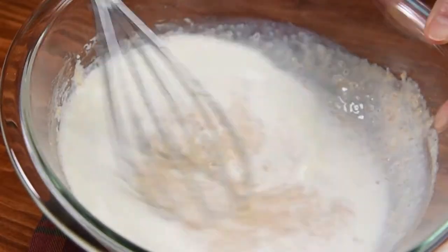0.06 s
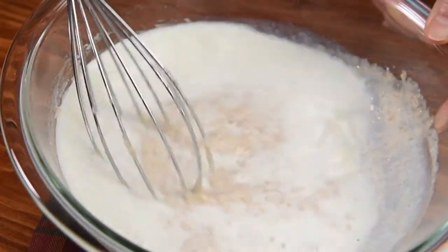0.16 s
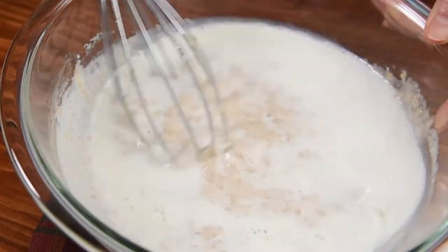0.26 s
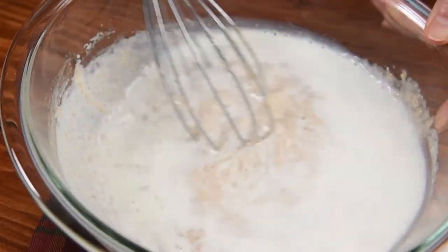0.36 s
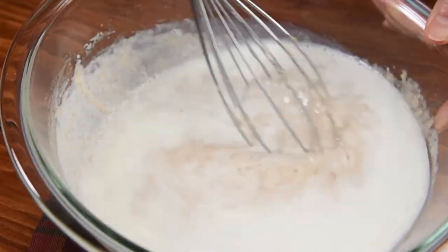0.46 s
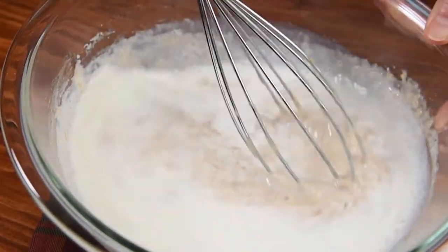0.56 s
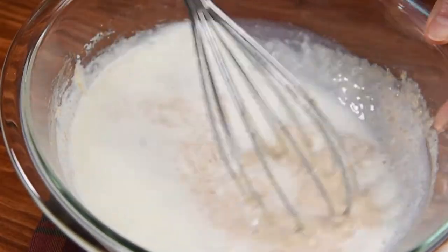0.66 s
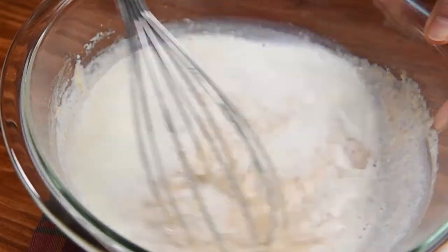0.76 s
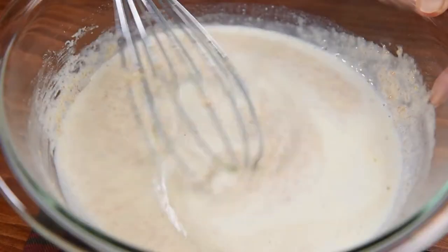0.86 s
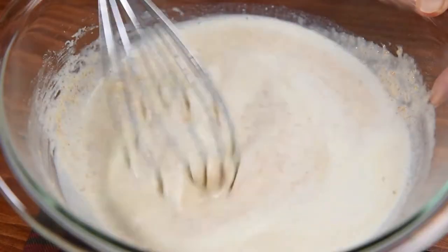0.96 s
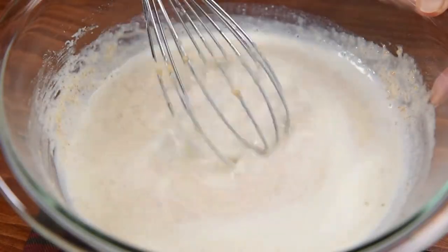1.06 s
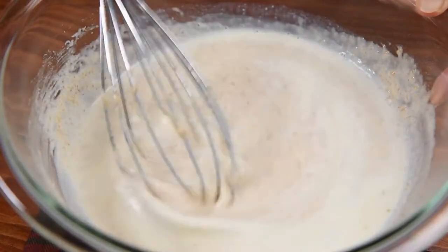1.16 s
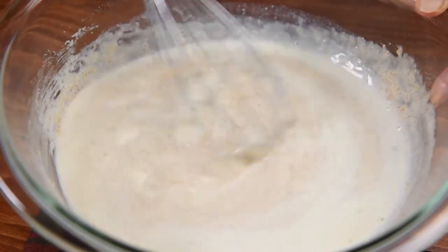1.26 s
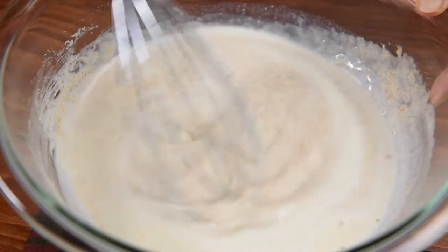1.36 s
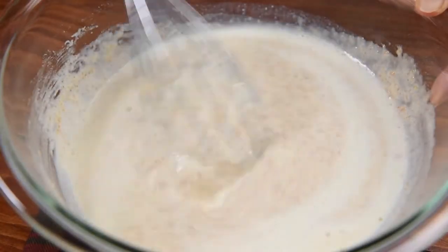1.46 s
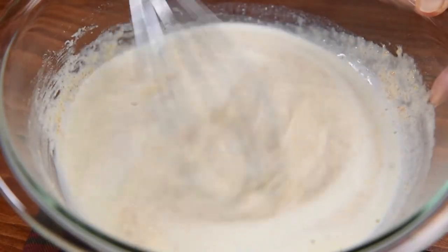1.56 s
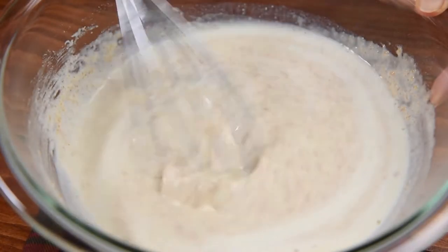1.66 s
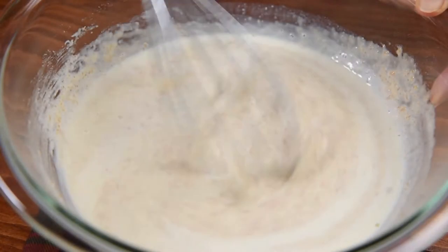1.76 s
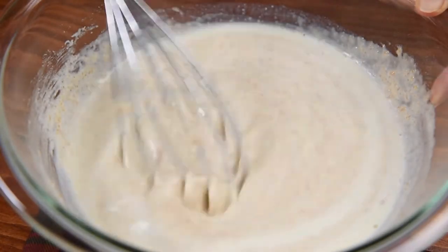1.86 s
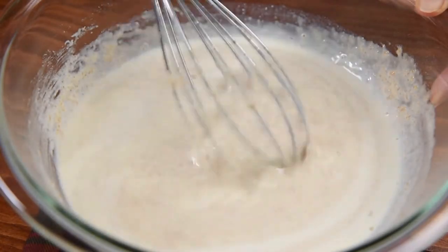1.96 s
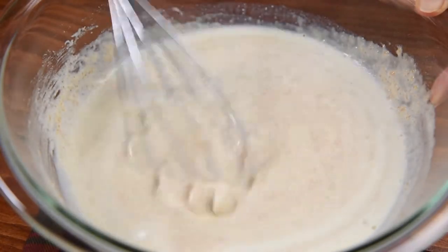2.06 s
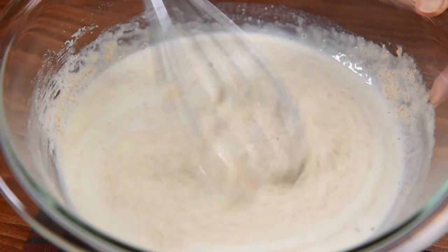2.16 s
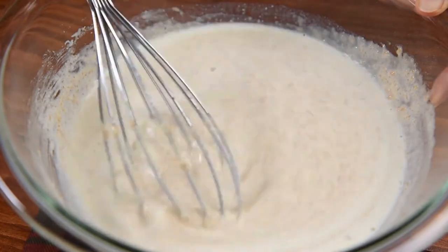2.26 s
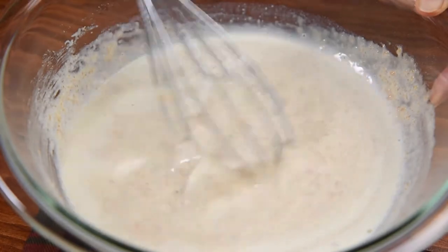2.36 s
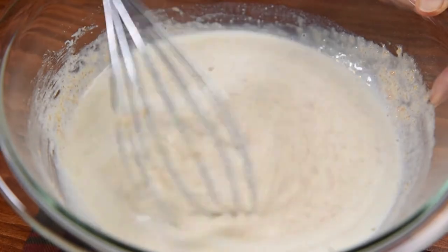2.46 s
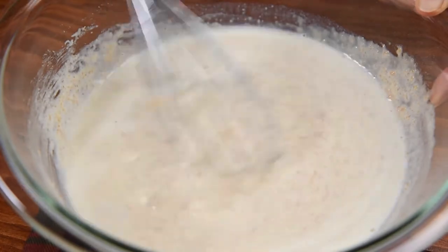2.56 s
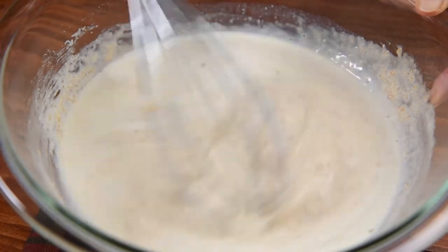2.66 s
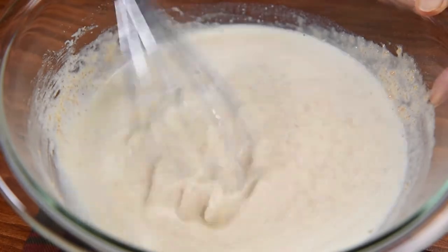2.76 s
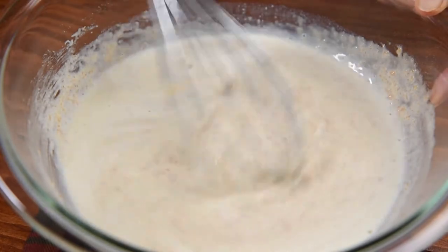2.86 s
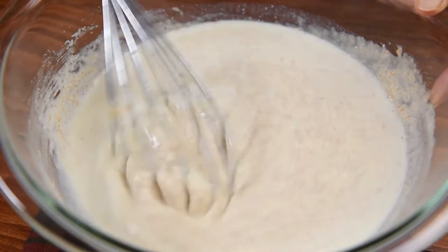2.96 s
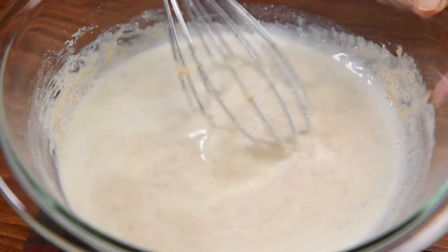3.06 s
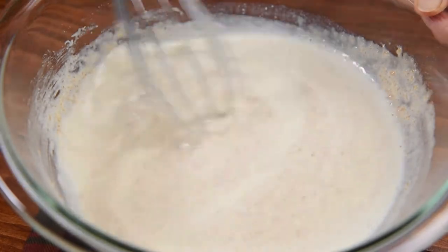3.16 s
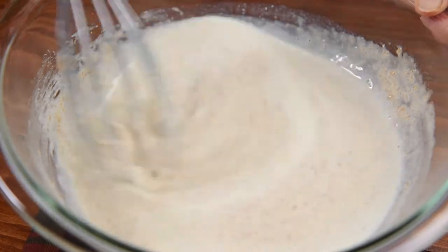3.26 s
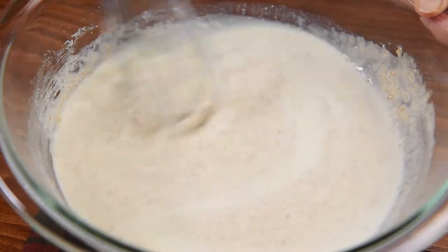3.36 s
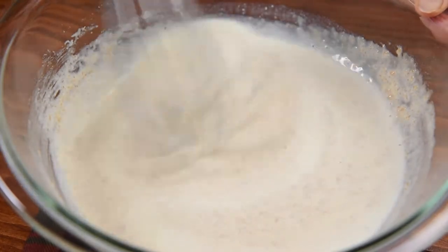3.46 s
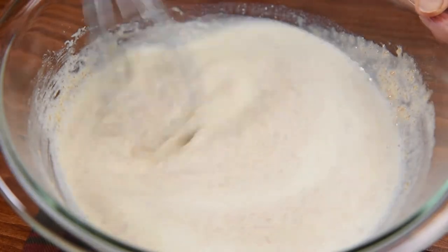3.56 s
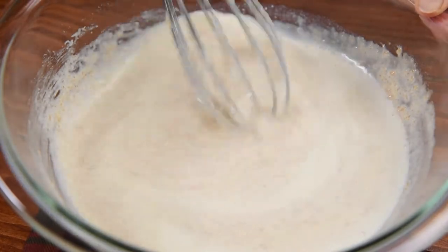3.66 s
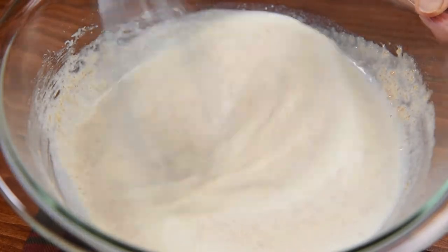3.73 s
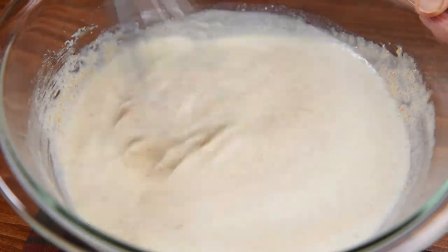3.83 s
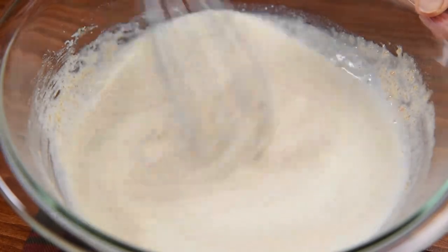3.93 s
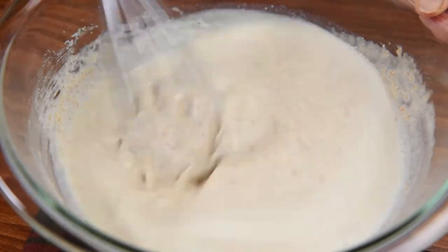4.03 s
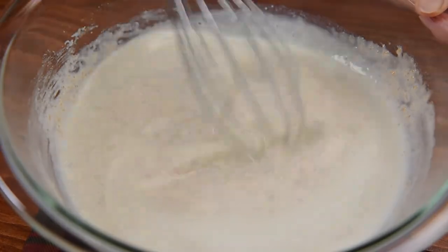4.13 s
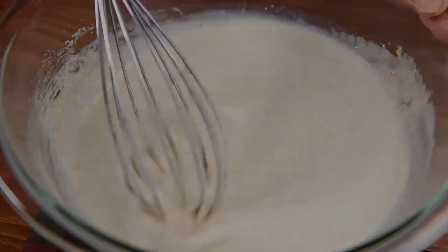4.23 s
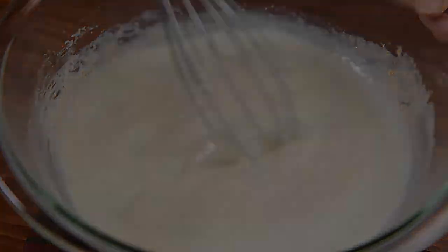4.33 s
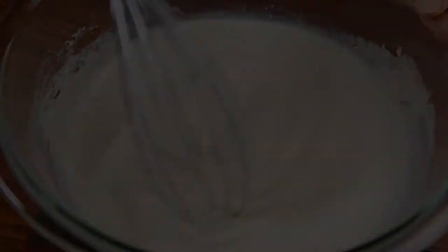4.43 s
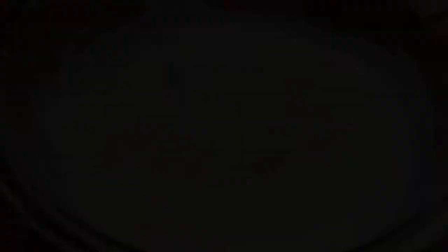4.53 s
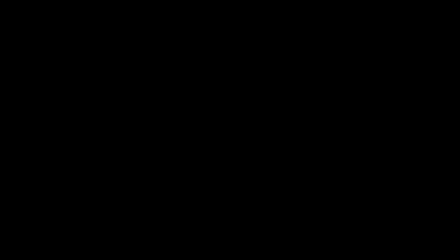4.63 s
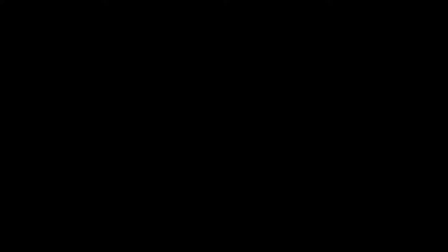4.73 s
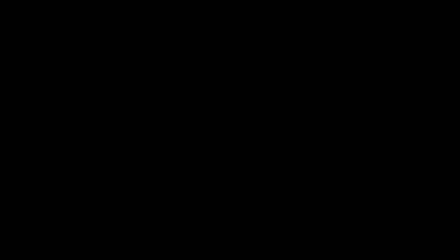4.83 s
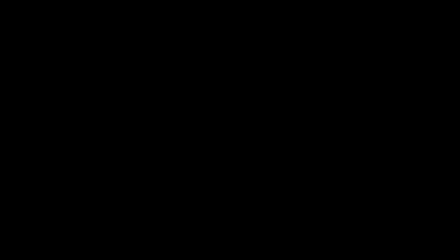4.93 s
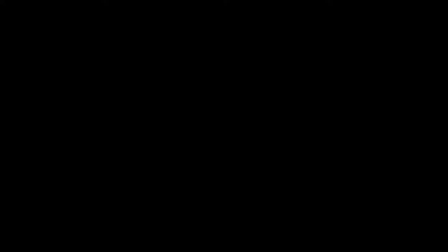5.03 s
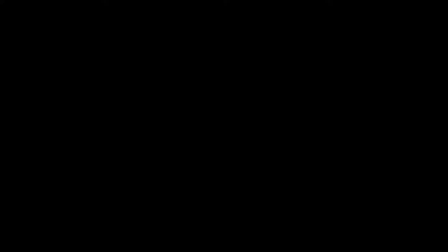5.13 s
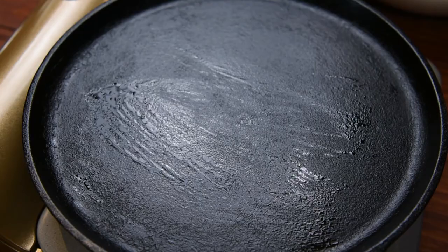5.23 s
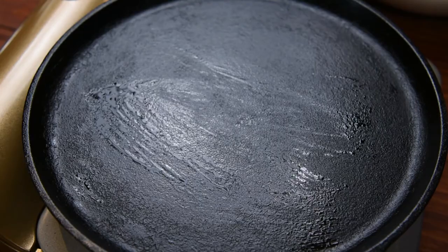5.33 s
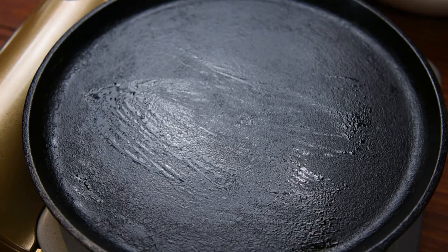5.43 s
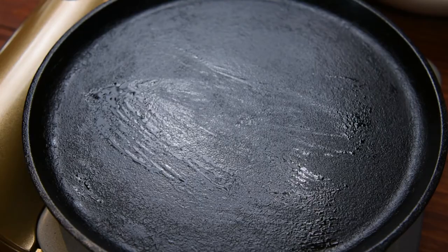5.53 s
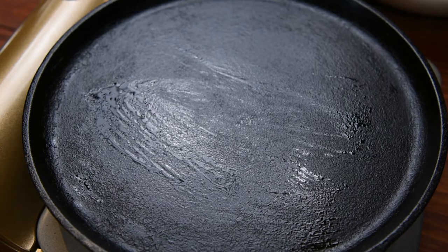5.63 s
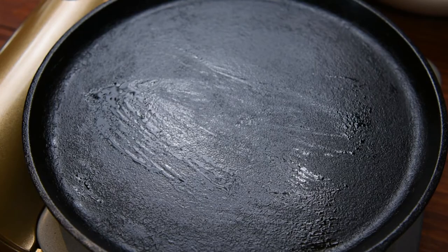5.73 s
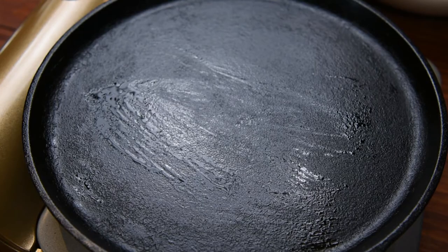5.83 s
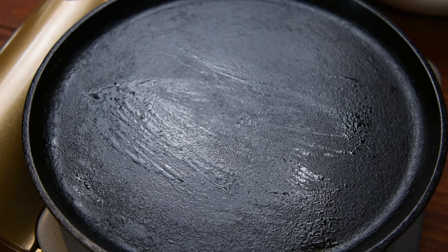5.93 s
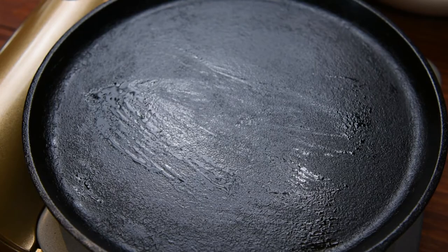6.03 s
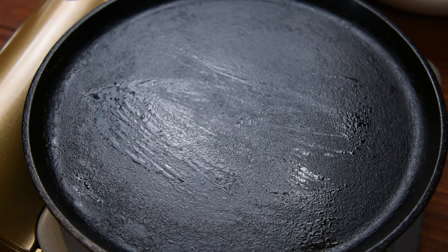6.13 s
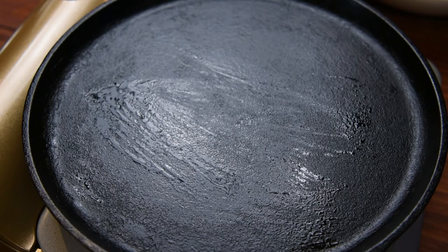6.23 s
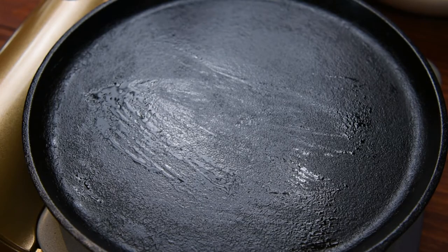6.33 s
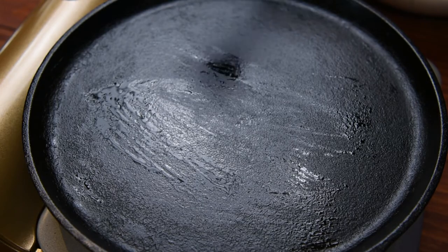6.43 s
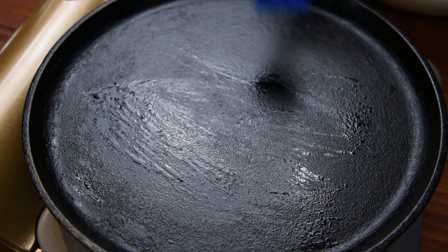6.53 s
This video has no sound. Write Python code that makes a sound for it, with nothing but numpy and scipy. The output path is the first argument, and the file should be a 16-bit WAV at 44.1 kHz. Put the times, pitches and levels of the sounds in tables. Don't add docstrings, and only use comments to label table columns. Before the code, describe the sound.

In a quiet kitchen, a whisk drags softly through lumpy batter with dull knocks and one small glass clink. About a second in, brisk beating starts, four or so clattering strokes a second, each a glassy clack with a hollow bowl note and wet slap. The strokes weaken and stop, a short complete silence follows, then faint oil sizzle and a low fan hum with two soft brush swells. Close microphone, centred.

```python
import sys
import numpy as np
from scipy import signal
from scipy.io import wavfile
from scipy.ndimage import uniform_filter1d

SR = 44100
rng = np.random.default_rng(int(sys.argv[2]) if len(sys.argv) > 2 else 0)


def boost(x):
    u = np.asarray(x, float) / 20
    return 10 ** u


def waveform_to_disk(signal):
    frames = np.transpose(np.atleast_2d(signal))
    scaled = np.clip(frames, -1, 1) * 32767
    samples = np.round(scaled).astype(np.int16)
    wavfile.write(sys.argv[1], SR, samples)


N = 290619
CUT_S, GAP_S = 0.8, (5.1005, 5.2665)
SOFT_S = 0.00019
EDGE_HZ = 15800


def seconds(size):
    return np.arange(size) / SR


def onset(t, rise_s):
    return 1 - np.exp(-t / rise_s)


def between(x, lo_hz, hi_hz):
    return signal.sosfilt(signal.butter(2, [lo_hz, hi_hz], "bandpass", fs=SR, output="sos"), x)


def read(points, hz):
    f, value = np.transpose(points)
    return np.interp(np.log(hz + 1), np.log(f + 1), value)


def evened(x):
    return x / np.sqrt(np.mean(x ** 2) + 1e-20)


def add(mix, s, sound):
    part = mix[round(s * SR):][:len(sound)]
    part += sound[:len(part)]


def ring(modes, scatter_db=0, loose=0, size=5000):
    hz, db, t60 = np.transpose(modes)[:, :, None]
    luck = rng.standard_normal((3, len(modes), 1))
    t = seconds(size)
    gains = boost(db + scatter_db * luck[0])
    turns = hz * (1 + loose * luck[1]) * t + 20 * loose * luck[2]
    sound = gains * boost(-60 * t / np.maximum(t60, 0.002)) * np.sin(2 * np.pi * turns)
    return sound.sum(0) / np.sqrt((gains ** 2).sum()) * onset(t, SOFT_S)


def splash(lo_hz, hi_hz, t60, size=5000):
    puff = between(rng.standard_normal(size), lo_hz, hi_hz)
    t = seconds(size)
    return evened(puff) * boost(-9 - 60 * t / t60) * onset(t, SOFT_S)


def noise(spectrum, patchy_db=0, size=2048):
    hz = np.fft.rfftfreq(size, 1 / SR)
    a, b = rng.standard_normal((N // (size // 4) + 5, len(hz), 2), dtype=np.float32).T
    patches = uniform_filter1d(a * b, size=12, axis=0)
    patches = evened(uniform_filter1d(patches, size=6, axis=1))
    gains = boost(read(spectrum, hz)[:, None] + patchy_db * patches)
    z = (a + 1j * b) * gains * (hz < EDGE_HZ)[:, None]
    return evened(signal.istft(z, nperseg=size, noverlap=size - size // 4)[1][:N])


def whistle(hz, width):
    r = np.exp(-np.pi * width / SR)
    slow = signal.lfilter([1 - r], [1, -r], rng.standard_normal(N) + 1j * rng.standard_normal(N))
    return evened((slow * np.exp(2j * np.pi * hz * seconds(N))).real)


def room_air(t, take):
    # (frequency [Hz], density [dB per Hz])
    colours = [
        [(12, -67), (20, -46), (109, -14), (282, -5.5), (324, -17), (394, -2.5), (453, -11), (633, -12),
         (885, -8), (1340, -12), (1980, -13.5), (2160, -19), (15600, -24.5)],
        [(12, -40), (20, -21.5), (45, -18.5), (85, -7), (176, 1.5), (466, -5), (599, 3), (989, -7), (1140, -4),
         (1240, -11.5), (2220, -18), (2480, -14), (3660, -19), (4450, -17.5), (15600, -23.5)],
        [(12, -51.5), (20, -57), (133, 6.5), (226, -7), (274, 4.5), (353, -25), (536, -4), (1020, -8),
         (2700, -14.5), (15600, -26.5)],
    ]
    # (frequency [Hz], width [Hz], level [dB])
    resonances = [
        [(880, 73, -70.5), (1108, 28, -83)],
        [(589, 58, -71.5), (162.8, 170, -78.5)],
        [(517.4, 170, -69), (2680, 32, -81.5), (1160, 86, -80), (164, 16.4, -76.5)],
    ]
    steps = np.arange(0, t[-1] + 1, 0.15)
    drift_db = 1.6 * np.interp(t, steps, rng.standard_normal(200)[:len(steps)])
    air_db = np.choose(take, (-67, -66.5, -68.5)) + drift_db
    air = np.choose(take, [noise(colour, 1.5) for colour in colours])
    peaks = [sum(boost(db) * whistle(hz, width) for hz, width, db in rows) for rows in resonances]
    return boost(air_db) * air + np.choose(take, peaks)


def scrape(t, take):
    # (time [s], level [dB])
    drag = [(0.0, -65), (0.13, -61.5), (0.27, -57), (0.41, -56), (0.59, -75), (1.17, -72), (1.3, -63.5),
            (1.62, -73), (2.07, -75), (2.46, -68.5), (2.72, -72.5), (3.06, -69), (3.3, -72.5), (3.63, -77),
            (3.97, -64), (4.13, -73), (4.3, -70), (4.9, -82)]
    # (time [s], lift [dB])
    brush = [(5.9, 7.9), (6.39, 10.2)]
    # (frequency [Hz], density [dB per Hz])
    dry_colour = [(180, -58), (300, -35), (372, -23), (572, -11), (611, -15), (1050, -11.5), (1330, -18),
                  (15600, -30.5)]
    # (frequency [Hz], density [dB per Hz])
    wet_colour = [(300, -28.5), (1000, -3), (2500, -0.5), (5000, -3), (9000, -14), (16000, -10.5)]
    oil_db = -74.5 + sum(db * np.exp(-0.5 * ((t - s) / 0.15) ** 2) for s, db in brush)
    level_db = np.where(take == 2, oil_db, np.interp(t, *np.transpose(drag)))
    wet = noise(wet_colour, 1.2, size=256)
    lumps = noise(dry_colour, 2.5, size=256)
    return boost(level_db - 5) * np.where(take, wet, lumps)


def rumble(t, take):
    # (time [s], level [dB])
    grips = [(1.35, -78), (1.75, -67), (2.25, -73), (2.52, -83), (3.06, -88), (4.72, -75), (5.6, -97)]
    rise_s, fall_s = 0.048, 0.084
    gain = boost(np.choose(take, (-108, -101, -101)))
    for s, db in grips:
        gain = gain + boost(db) * np.exp(np.minimum((t - s) / rise_s, (s - t) / fall_s))
    return gain * noise([(8, -6.0), (23, -7.0), (30, -27.5), (50, -72.5)], size=4096)


def knock(db, hz, t60, wood_db):
    body = ring([(hz, 0, t60), (0.91 * hz, -5, t60), (0.568 * hz, -12, t60), (0.385 * hz, -20, t60)], 3)
    body *= onset(seconds(5000), 0.00034)
    return boost(db) * (body + boost(wood_db) * splash(0.34 * hz, 2.5 * hz, 0.1))


def tick(db, hz, t60):
    snap = splash(0.3 * hz, min(2.3 * hz, 16000), 0.3 * t60, size=2000)
    rasp = splash(0.67 * hz, min(1.36 * hz, 16000), 1.1 * t60, size=2000)
    modes = [(hz, 0, 0.57 * t60), (4 * hz, -5, 0.24 * t60), (hz, -7, 0.58 * t60)]
    tone = ring(modes, 1.96, 0.042, size=2000)
    return boost(db) * (1.14 * tone + 1.34 * rasp + 1.7 * snap)


def wire_ticks():
    # (time [s], peak [dB], pitch [Hz])
    ticks = [(0.2725, -36, 7700), (1.146, -46, 3450), (1.273, -53, 10500), (1.327, -43, 2700),
             (1.3521, -28, 4860), (1.386, -39, 2680), (1.567, -48.5, 3870), (2.0534, -32, 10200),
             (2.6766, -38, 5560), (2.713, -39, 5000), (2.929, -53, 4180), (3.385, -41, 3040),
             (3.485, -53, 5460), (3.5984, -48, 3780), (4.385, -47, 2400), (3.6346, -43.5, 2380),
             (3.717, -21.5, 8350), (3.7166, -32.5, 1520), (3.7349, -26.5, 5900), (3.848, -30.5, 3180),
             (3.8521, -40.5, 5500), (3.8907, -34.5, 4500), (3.98, -36, 6070), (3.9857, -39, 5300),
             (3.9906, -37, 4900), (4.0076, -50, 3360), (4.0682, -47, 4000), (4.0842, -38, 3950),
             (4.116, -39.5, 2180), (4.3928, -38.5, 5160)]
    # (time [s], pitch [Hz])
    grazes = [(0.28, 1200), (0.42, 2350), (0.29, 1750), (0.69, 1900), (4.988, 5700), (2.439, 10200),
              (2.5, 2700), (3.144, 5900), (3.488, 5900), (2.9, 11800), (4.4015, 4500), (4.702, 10500),
              (4.0245, 7500), (4.207, 4700), (2.6765, 2900), (3.974, 13000), (1.6, 10500), (0.88, 1400),
              (1.6, 5000), (0.171, 1900), (0.38, 950), (4.3, 3500), (4.9, 14700), (5.0502, 3200)]
    rows = [(s, db, hz, 0.0088 * boost(0.3 * (-40 - db))) for s, db, hz in ticks]
    return rows + [(s, -52.5, hz, 0.015) for s, hz in grazes]


def clink():
    # (frequency [Hz], level [dB], ring time t60 [s])
    cup = [(4000, -3.5, 0.025), (6070, 4, 0.025), (8400, 11, 0.022), (10300, -10, .03), (11100, -15, .025),
           (13700, -17, .03), (15360, 0, 0.042)]
    return boost(-33) * ring(cup)


def thud(db, hz, t60):
    return boost(db) * ring([(hz, 0, t60), (1.1 * hz, -2, t60)]) * signal.windows.tukey(5000, 0.2)


def patch(db, hz, t60, rise_s):
    t = seconds(2000)
    pair = np.sin(2 * np.pi * hz * t) + 0.15 * np.sin(2 * np.pi * 1.06 * hz * t)
    return boost(db - 60 * t / t60) * pair * onset(t, rise_s)


def ringing_patches():
    # (time [s], level [dB], pitch [Hz])
    contact_patches = [(0.9526, -41, 2720), (0.9588, -45, 4320), (1.164, -22, 4480), (1.1688, -24.5, 4340),
                       (1.1732, -31.5, 3400), (1.3522, -37.5, 4730), (1.399, -25, 5050), (1.4023, -24.5, 4800),
                       (1.6098, -19.5, 4420), (1.6128, -26.5, 2770), (1.6165, -25, 5300), (1.6205, -33, 3230),
                       (1.8288, -27.5, 4320), (1.8338, -33, 5160), (1.837, -48, 3920), (2.0531, -28, 4600),
                       (2.057, -37, 5020), (2.2632, -45, 2670), (2.2676, -27, 3130), (2.3207, -41, 5330),
                       (2.5126, -28, 2470), (2.521, -31, 5250), (2.526, -30, 5190), (2.676, -47, 6000),
                       (2.7128, -49.5, 4940), (2.7488, -43, 4500), (2.7543, -26.5, 2730), (2.9636, -34, 2730),
                       (2.973, -41, 3100), (2.9851, -57, 2700), (3.3055, -27.5, 3310), (3.308, -25, 4280),
                       (3.3142, -30, 4300), (3.5543, -42, 3000), (3.5583, -32.5, 4900), (3.5671, -55, 3680),
                       (3.7168, -49, 8500), (3.7352, -41, 6100), (3.8124, -25, 4360), (3.817, -40.5, 4180),
                       (3.8225, -36.5, 3200), (3.848, -49.5, 4300), (3.8905, -44.5, 4420), (3.98, -50, 6090),
                       (3.99, -55, 4480), (4.0383, -35.5, 2600), (4.0442, -26.5, 4190), (4.0505, -32, 4580),
                       (4.2793, -29.5, 3330), (4.2867, -26.5, 4330), (4.29, -36, 4300), (4.3925, -55.5, 5240),
                       (4.511, -47, 1980), (4.5164, -23.5, 3420), (4.522, -40, 3680), (4.7283, -39, 2760),
                       (4.9715, -43.5, 3360), (4.992, -56, 2730), (5.001, -46.5, 2410),
                       (0.9521, -44, 2020), (1.165, -31, 2800), (1.1704, -29.5, 3310), (1.1732, -37.5, 4380),
              (1.3522, -53, 5640), (1.4, -26, 4370), (1.402, -29, 2850), (1.6098, -26, 4920),
              (1.6128, -33, 5570), (1.6155, -25.5, 2670), (1.6205, -34, 5090), (1.8288, -40, 2400),
              (1.8343, -27, 4400), (1.837, -30, 5020), (2.0531, -29, 5260), (2.057, -48, 3680),
              (2.2632, -40, 1920), (2.268, -40.5, 3820), (2.3209, -40.5, 2610), (2.512, -34, 7280),
              (2.521, -33, 2670), (2.525, -33.5, 2970), (2.676, -51.5, 6450), (2.7505, -28, 7240),
              (2.753, -29, 4570), (2.9636, -40, 2000), (2.9851, -50, 1930), (3.3068, -38, 4350),
              (3.308, -30.5, 5460), (3.3142, -36, 5530), (3.5543, -40, 3530), (3.558, -36, 3020),
              (3.5671, -60, 2930), (3.7168, -55.5, 6800), (3.7352, -49.5, 7520), (3.8126, -26.5, 3230),
              (3.817, -32, 3700), (3.8207, -39, 2290), (3.848, -51, 2920), (3.8905, -51, 5200),
              (3.99, -56, 5080), (4.0437, -30.5, 3270), (4.0504, -32.5, 3810), (4.2793, -28.5, 7100),
              (4.2867, -39, 3870), (4.29, -33, 3180), (4.3925, -53, 4800), (4.511, -47, 3520),
              (4.5164, -30, 4900), (4.522, -40, 5150), (4.7286, -40, 3300), (4.9707, -52, 4220),]
    # (time [s], level [dB], pitch [Hz])
    late = [(1.1858, -35.5, 834), (1.1902, -52.5, 4380), (1.196, -47.5, 3080), (2.9645, -53, 1490),
            (1.3847, -60, 2790), (1.4159, -32.5, 864), (1.6502, -52, 4480), (1.6531, -62, 850),
            (2.0892, -39.5, 820), (2.2772, -41.5, 770), (2.3309, -44, 845), (2.535, -45, 830),
            (2.5565, -53.5, 6400), (1.645, -48, 785), (2.6843, -66, 5810), (2.776, -45, 800),
            (2.7953, -50.5, 4080), (3.3315, -52, 6240), (3.3417, -57, 6120), (3.354, -55, 7320),
            (3.3656, -55, 4310), (3.3758, -60, 4330), (3.3838, -54, 935), (3.4861, -54, 3550),
            (3.5833, -54, 3170), (3.5862, -40.5, 829), (3.6345, -52, 4500), (3.8329, -53, 7670),
            (4.0143, -56, 2760), (4.0223, -61, 8010), (4.0593, -44, 2500), (4.0615, -53, 7620),
            (4.0782, -45, 880), (4.137, -64, 3400), (1.864, -49, 800), (4.4004, -62.5, 6400),
            (4.4736, -52.5, 876), (4.5426, -62, 6200), (4.7828, -59, 3320), (5.0208, -55, 865)]
    rows = [(s, db, hz, 0.018, 0.0005) for s, db, hz in contact_patches]
    return rows + [(s, db, hz, 0.049 * (800 / hz) ** 0.27, 0.0012) for s, db, hz in late]


def bowl_note(note_hz, belly_db):
    # (frequency [Hz], level [dB], ring time t60 [s])
    belly = [(190, -26, 0.061), (345.5, -21, 0.059), (635.4, -15, 0.045), (842.8, -6.5, 0.061),
             (1228, -18, 0.062), (1307, -17, 0.067), (1414, -19, 0.069)]
    t = seconds(5000)
    note = ring([(note_hz, 0, 0.035)]) + boost(belly_db) * ring(belly, 3.5, 0.02)
    note *= onset(t, 0.0024)
    note += boost(belly_db - 13.5) * splash(220, 2300, 0.094)
    rim = ring([(803, 0, 0.079)]) * onset(t, 0.025)
    return note - boost(-17.5) * rim


def blow(clack_db, note_db, edge_db, note_hz, loud_hz, lag_s, belly_db):
    # (frequency [Hz], level [dB], ring time t60 [s])
    wall = [(2140, 3, 0.018), (2275, -7.5, 0.044), (2560, 0.5, 0.028), (2690, -2.5, 0.04),
            (2914, -3.5, 0.035), (3180, -8, 0.024), (3190, 8, 0.0099), (3582, 2.5, 0.032), (4016, 5, 0.013),
            (4010, -7, 0.017), (4394, 8.5, 0.016), (1930, -10, 0.015), (4860, 5, 0.0095),
            (5300, -2.5, 0.018), (1726, -8.5, 0.01), (5450, 7, 0.0074), (6050, 0.5, 0.012)]
    # (frequency [Hz], level [dB], ring time t60 [s])
    wires = [(6200, -33.5, 0.005), (7250, 2.5, 0.019), (8000, 2.5, 0.0093), (8200, -17.5, 0.0049),
             (10560, -14, 0.014), (9730, 6.5, 0.0085), (10100, 1.5, 0.0069), (11830, -10, 0.015),
             (12000, 2, 0.0082), (13600, -11, 0.0075), (13700, -29.5, .01), (14900, -3.5, .008),
             (15800, -12, .008)]
    t = seconds(5000)
    slope_db = 0.24 * min(edge_db - clack_db + 12.5, 0)
    glass = [(hz, db + slope_db * np.log2(hz / 3000), t60) for hz, db, t60 in wall]
    struck = [(hz, db + 9.5 * np.exp(-(np.log(hz / loud_hz) / 0.046) ** 2), t60) for hz, db, t60 in glass]
    clack = ring(struck, 5.5, 0.02, size=2000) + splash(1690, 6000 * boost(slope_db), 0.031, size=2000)
    edge = ring(wires, 5.5, 0.0086, size=2000) + splash(6300, 14000, 0.015, size=2000)
    bounces = rng.standard_normal(len(t)) * (rng.random(len(t)) < 610 / SR)
    chatter = bounces * boost(-8.5 - 60 * t / 0.035)
    bounce = boost(clack_db) * ring(glass, 0.89, 0.029, size=1000) + boost(edge_db) * edge[:1000]
    sound = signal.fftconvolve(chatter, bounce)[:len(t)]
    add(sound, lag_s, boost(note_db) * bowl_note(note_hz, belly_db)[:4900])
    add(sound, 0, boost(clack_db - 4.5) * clack + boost(edge_db) * edge)
    return sound


def wire_landings():
    # (time [s], clack [dB], bowl note [dB], sharp edge [dB], bowl note [Hz])
    strokes = [(0.9527, -40.5, -30, -52, 796), (1.164, -18.5, -17.5, -27.5, 811),
               (1.399, -17, -20.5, -23, 819), (1.6096, -17, -21.5, -21.5, 803),
               (1.8288, -24, -19.5, -39, 819), (2.0528, -23.5, -16, -58, 822),
               (2.2622, -30.5, -29.5, -62, 845), (2.3206, -33, -33, -53, 783),
               (2.5126, -29, -22.5, -39, 799), (2.7491, -19.5, -23.5, -21.5, 825),
               (2.9635, -32, -25, -75, 760), (3.308, -22, -34, -26, 800), (3.5526, -40, -29.5, -49, 826),
               (3.8124, -19, -24, -19, 824), (4.0378, -30.5, -23.5, -63, 815),
               (4.2794, -23, -23, -33.5, 820.6), (4.511, -41, -26.5, -65.5, 828),
               (4.7246, -59, -34.5, -63, 933), (4.9713, -43.5, -37, -83.5, 894)]
    fullness_db = [-8, -7.5, -7, -5, -6.5, -10, -5.5, -7.5, -12, -14.5, -4, 0.5, -7, -4, -7, -3, -7.5, -4,
                   -7.5]
    # (time [s], clack [dB], bowl note [dB], loudest clack [Hz])
    trailing = [(0.959, -46, -29.5, 4380), (1.1684, -28, -29, 4440), (1.1727, -21.5, -33.5, 3420),
                (1.4027, -21.5, -42, 4900), (1.6131, -19.5, -50, 4740), (1.6163, -19.5, -37, 5300),
                (1.6206, -21, -28, 2970), (1.8337, -22, -33, 5000), (1.837, -23, -25, 4870),
                (2.057, -22, -25.5, 4860), (2.267, -20.5, -27.5, 2960), (2.521, -23.5, -23.5, 2780),
                (2.753, -21, -18, 2750), (2.973, -36.5, -37, 3080), (2.9844, -42.5, -44, 2680),
                (3.3139, -51, -39, 4350), (3.558, -27.5, -24, 3180), (3.5678, -34, -41, 3630),
                (3.8216, -25.5, -27.5, 3300), (4.0432, -22, -52, 4000), (4.0442, -29, -56, 4330),
                (4.0522, -37.5, -40.5, 4370), (4.287, -25, -39, 4000), (4.289, -33, -43.5, 4240),
                (4.5161, -21.5, -58, 4860), (4.519, -24, -40, 3260), (4.728, -36.5, -43.5, 2730),
                (4.992, -44.5, -52, 2720), (5.001, -54, -43, 2360)]
    bare_hz, cushioned_hz = 4500, 2670
    starts, notes = np.transpose(strokes)[::4]
    luck = rng.standard_normal((60, 2))
    rows = []
    for (s, clack_db, note_db, edge_db, note_hz), chance, belly_db in zip(strokes, luck[:, 0], fullness_db):
        cushion = np.clip((edge_db - clack_db) / -22.5, 0, 1) ** 2
        loud_hz = (bare_hz + (cushioned_hz - bare_hz) * cushion) * (1 + 0.13 * chance)
        rows.append((s, clack_db, note_db, edge_db, note_hz, loud_hz, 0, belly_db))
    for (s, clack_db, note_db, loud_hz), chance in zip(trailing, luck[:, 1]):
        stroke = np.searchsorted(starts, s) - 1
        note_hz = notes[stroke] * (0.97 + 0.004 * chance)
        lag_s = ((starts[stroke] - s) * notes[stroke] % 1) / notes[stroke]
        edge_db = -28 + 2.1 * (clack_db + 21)
        rows.append((s, clack_db, note_db, edge_db, note_hz, loud_hz, lag_s, fullness_db[stroke]))
    return rows


def ping(db, hz, t60):
    t = seconds(3000)
    glide = 2.5 * (hz < 2000)
    turns = hz * (t + 0.5 * glide * t ** 2)
    pair = np.sin(2 * np.pi * turns) + 0.4 * np.sin(2 * np.pi * 1.04 * turns)
    return boost(db - 60 * t / min(t60, 0.055)) * pair * onset(t, 0.0012)


def echoes(x):
    # (frequency [Hz], decay time t60 [s])
    decay = [(200, 0.48), (800, 0.12), (2500, 0.2), (6000, 0.17), (14000, 0.21)]
    hz, t, z = signal.stft(rng.standard_normal(SR // 2), SR, nperseg=256)
    z = z * boost(-60 * t / read(decay, hz)[:, None]) * (hz < EDGE_HZ)[:, None]
    tail = signal.istft(z, SR, nperseg=256)[1]
    tail = tail * onset(seconds(len(tail)), 0.0034)
    treble = signal.sosfilt(signal.butter(2, 1500, "highpass", fs=SR, output="sos"), x)
    flutter = evened(uniform_filter1d(rng.standard_normal(N), size=int(SR / 1100)))
    x = x + 0.85 * treble * (flutter - 1)
    return signal.fftconvolve(x, tail / np.linalg.norm(tail))[:N]


def whisk():
    # (time [s], peak [dB], pitch [Hz], ring time t60 [s], wood [dB])
    knocks = [(0.17, -32.5, 733, 0.035, -13), (0.369, -50, 1100, 0.027, -8), (0.691, -49, 686, 0.067, 2),
              (0.765, -36, 723, 0.034, -8.5), (3.872, -48, 880, 0.027, -11), (3.894, -46, 880, 0.024, -5),
              (4.769, -50.5, 857, 0.11, -1), (5.003, -52, 880, 0.088, 4.5)]
    # (time [s], level [dB], pitch [Hz], ring time t60 [s])
    pings = [(3.600, -62, 4800, .05), (3.7225, -41, 6270, .015), (3.725, -44, 6300, .015),
             (3.741, -45, 6300, 0.045), (3.938, -48, 1620, 0.038), (4.992, -38, 2820, 0.012),
             (4.049, -38, 930, 0.031), (4.061, -44, 1190, 0.03), (4.292, -40, 914, 0.027),
             (4.298, -47, 1240, 0.028), (4.519, -32, 903, 0.032), (4.527, -45, 1200, 0.024),
             (1.618, -33.5, 906, 0.035), (2.268, -33, 880, 0.044), (2.2715, -27, 2720, 0.026),
             (4.288, -32, 4320, .02), (1.567, -53, 2900, .012)]
    # (time [s], level [dB], pitch [Hz], ring time t60 [s])
    thuds = [(.69, -56.5, 101.5, 0.25), (1.29, -51, 200, 0.13), (2.28, -63, 72.5, 0.18),
             (4.725, -53, 130, .1)]
    sources = ((knocks, knock), (wire_ticks(), tick), (ringing_patches(), patch),
               (wire_landings(), blow), (pings, ping))
    mix = np.zeros(N)
    for table, strike in sources:
        for s, *how in table:
            add(mix, s, strike(*how))
    add(mix, 0.2724, clink())
    mix = between(mix, 110, 12100)
    for s, *how in thuds:
        add(mix, s, thud(*how))
    return mix + boost(-18) * echoes(mix)


def fan(t, take):
    hz = 274.5
    hum = np.sqrt(2) * np.sin(2 * np.pi * hz * t) + 0.2 * whistle(hz, 6)
    return boost(-75) * hum * (take == 2)


def kitchen():
    t = seconds(N)
    take = np.searchsorted([CUT_S, GAP_S[1]], t)
    return room_air(t, take) + scrape(t, take) + rumble(t, take) + fan(t, take)


def scene():
    return np.tile(whisk() + kitchen(), (2, 1))


def band_limit(x):
    return signal.sosfilt(signal.butter(12, 16700, fs=SR, output="sos"), x)


def record(dry):
    # (frequency [Hz], density [dB per Hz])
    hiss_colour = [(18, -39), (30, -9), (325, 0), (422, -3), (641, -1.5), (711, -4), (15600, -7.5)]
    t = seconds(N)
    hiss = boost(-70) * np.array([noise(hiss_colour), noise(hiss_colour)])
    is_open = np.clip(np.maximum(GAP_S[0] - t, t - GAP_S[1]) / 0.001, 0, 1)
    lowpass = signal.firwin(255, 16600, window=("kaiser", 8), fs=SR)
    band = signal.oaconvolve(dry + hiss, lowpass[None], "same")
    return band_limit(band * is_open)


dry = scene()
out = record(dry)
waveform_to_disk(out)
```